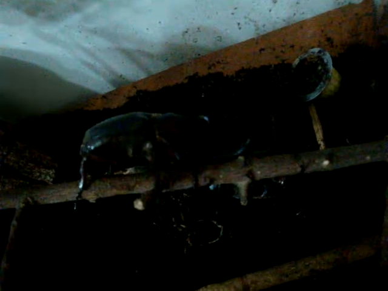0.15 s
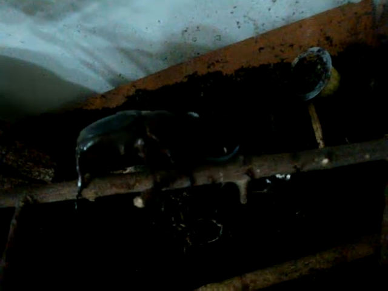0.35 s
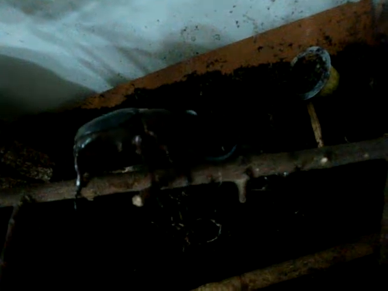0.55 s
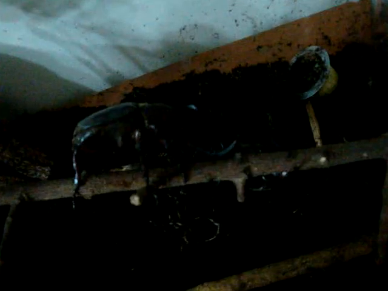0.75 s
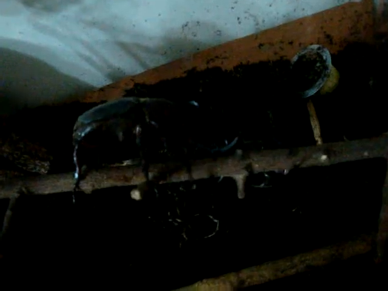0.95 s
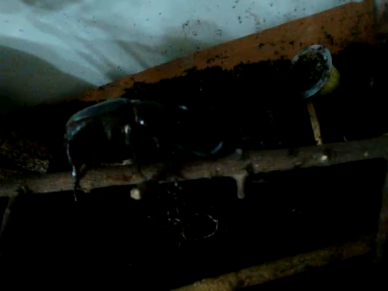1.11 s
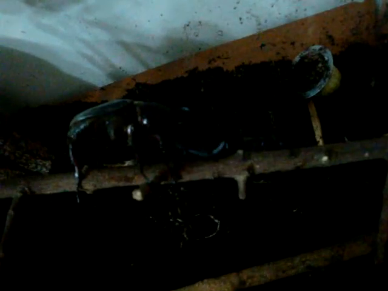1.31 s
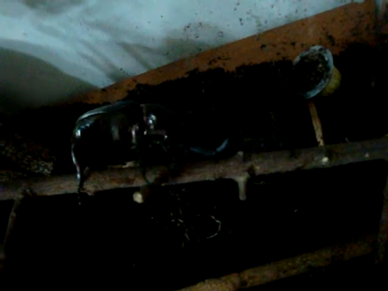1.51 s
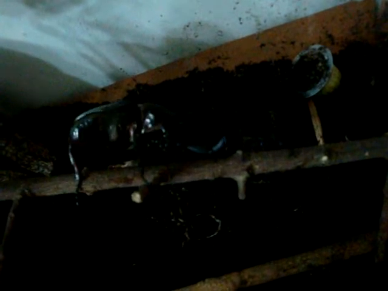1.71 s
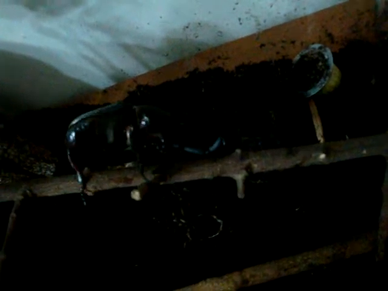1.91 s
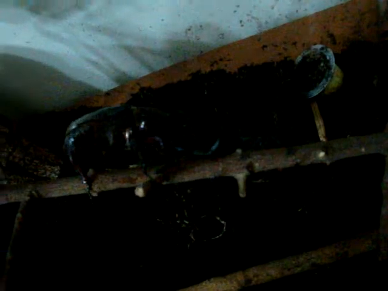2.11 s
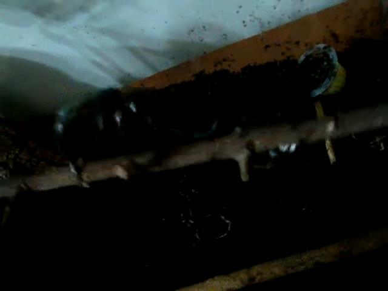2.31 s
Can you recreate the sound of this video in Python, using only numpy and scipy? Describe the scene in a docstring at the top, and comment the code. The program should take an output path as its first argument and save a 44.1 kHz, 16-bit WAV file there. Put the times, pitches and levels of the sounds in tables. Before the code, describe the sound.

Beetle claws scraping bark with a dull thump, then soft rustles and ticks indoors.

```python
"""From the start, an appliance buzzes at the mains rate over a steady indoor hiss.
Close by, a large beetle shifts on a twig in its keeping box, and a claw plucks a bark fibre.
Claws and shell slip twice in the first half second, scraping the bark and thumping the box.
Then it settles into soft rustles and ticks as its legs drag and its claws pluck,
joined from about one second on by the dry snaps of its claw tips."""
import sys
import numpy as np
from scipy.fft import rfft, irfft, next_fast_len
from scipy.io import wavfile
from scipy.ndimage import map_coordinates

SR = 44100
rng = np.random.default_rng(int(sys.argv[2]) if len(sys.argv) > 2 else 0)


def to_wav(s):
    """Save 16-bit WAV."""
    ch = np.atleast_2d(s).T  # columns
    pcm = np.round(np.clip(ch, -1, 1) * 32767)  # PCM
    wavfile.write(sys.argv[1], SR, pcm.astype(np.int16))


N = 103635


def amp(db):
    """Decibels to gain."""
    return 10 ** (np.asarray(db) / 20)


def unit(x):
    """Scale to rms 1."""
    return x / np.sqrt(np.mean(x ** 2) + 1e-20)


def clock():
    """The time of each sample in seconds."""
    return np.arange(N) / SR


def wobble(per_s):
    """A smooth random modulator with per_s new values a second."""
    return map_coordinates(rng.standard_normal(8192), [clock() * per_s], mode="wrap")


def filtered(x, response):
    """Filter x with a gain given as a function of frequency."""
    size = next_fast_len(N + SR // 2)
    return irfft(rfft(x, size) * response(np.fft.rfftfreq(size, 1 / SR)), size)[:N]


def coloured(x, curve, tilt_db=0):
    """x through an EQ curve, tilted by tilt_db per octave above 1 kHz, at rms 1."""
    hz, db = np.transpose(curve)

    def eq(f):
        curve_db = np.interp(np.log(f + 1), np.log(hz), db)
        return amp(curve_db + tilt_db * np.log2(np.maximum(f, 1000)))
    return unit(filtered(x, eq))


def noise_band(hz, width_hz):
    """White noise through a steep-sided resonance, at rms 1."""
    def band_pass(f):
        return 1j * f * width_hz / (hz * hz - f * f + 1j * f * width_hz)
    return unit(filtered(rng.standard_normal(N), lambda f: band_pass(f) ** 2))


def stroke(start, rise, fall_db_per_s):
    """An envelope with a smooth attack and an exponential decay."""
    t = clock() - start
    attack = np.sin(np.pi / 2 * np.clip(t / rise, 0, 1)) ** 2
    return attack * amp(-fall_db_per_s * np.maximum(t - rise, 0))


# partials of the buzz (harmonic [multiple of the mains rate], level [dB])
BUZZ_PARTIALS = [(2, -56.5), (3, -53), (5, -56), (6, -50.5), (7, -53), (8, -62.5), (10, -65), (11, -64),
                 (12, -53), (13, -61.5), (14, -57), (15, -97), (16, -72.5), (18, -83.5)]


def appliance(mains_hz=59.96, delay_s=0.004204, fizz_lag_s=0.0075):
    """Mains harmonics, nearly in phase, make one pulse a cycle, each followed by a faint fizz."""
    t = clock() - delay_s
    buzz = np.zeros(N)
    for harmonic, db in BUZZ_PARTIALS:
        gain = amp(db + 0.6 * wobble(per_s=3.72))
        buzz += gain * np.cos(2 * np.pi * harmonic * mains_hz * t + rng.normal(0, 0.3))
    fizz_gate = unit(np.cos(np.pi * mains_hz * (t - fizz_lag_s)) ** 24)
    return buzz + amp(-67) * fizz_gate * noise_band(5600, width_hz=4000)


# EQ of the room tone (frequency [Hz], relative level [dB])
HISS_EQ = [(20, -46), (55, 1), (80, -5.5), (125, 4), (200, 2), (300, 6), (420, 3.5), (560, -0.5),
           (780, 4.5), (1100, -3), (2200, -7.5), (2800, -9.5), (3800, -8), (4400, -8.5), (5500, -14.5),
           (7500, -16.5), (10000, -18)]


def room_hiss(level_db=-47.5, waver_db=0.76, flicker_db=2, split_hz=5000):
    """A steady bed of room air; its treble flickers a little."""
    air = amp(level_db + waver_db * wobble(per_s=7.16)) * coloured(rng.standard_normal(N), HISS_EQ)
    treble = filtered(air, lambda f: f > split_hz)
    return air - treble + treble * amp(flicker_db * wobble(per_s=60.16))


# plucks of bark fibres (time [s], level [dB], pitch [Hz])
FIBRE_TICKS = [(0.141, -48, 2780), (0.879, -48.5, 2630), (0.977, -48, 3200), (1.071, -42.5, 2830),
               (1.127, -52.5, 3120), (1.186, -54, 3300), (1.407, -46.5, 2830), (1.520, -48, 2830),
               (1.568, -51, 4000), (1.615, -48.5, 4440), (1.663, -42.5, 2780), (1.739, -45.5, 3360),
               (1.844, -48, 4680), (1.86, -49, 4520), (1.877, -41, 3610), (1.961, -48, 4500),
               (1.981, -48.5, 3240), (2.021, -51.5, 3490), (2.202, -46, 3370), (2.327, -47.5, 4650)]


def fibre_ticks(rise_s=0.0041, t60_s=0.061):
    """Claws pluck bark fibres, which ring with a short, rough tone."""
    out = np.zeros(N)
    for start, db, hz in FIBRE_TICKS:
        phase_jitter = wobble(per_s=750)
        tone = np.sqrt(2) * np.sin(2 * np.pi * hz * clock() + phase_jitter)
        out += amp(db) * stroke(start, rise_s, 60 / t60_s) * tone
    return out


def friction(grains_per_s=1500, spread_db=3, grain_share=0.62, judder_db=1.47):
    """Dense stick-slip grains of uneven size over smooth rubbing, under a juddering pressure."""
    impulses = (rng.random(N) < grains_per_s / SR) * rng.choice([-1, 1], N)
    grains = unit(impulses * amp(spread_db * rng.standard_normal(N)))
    rubbing = rng.standard_normal(N)
    texture = np.sqrt(grain_share) * grains + np.sqrt(1 - grain_share) * rubbing
    return texture * amp(judder_db * wobble(per_s=110))


# EQ of the hard scrape (frequency [Hz], relative level [dB])
SCRAPE_EQ = [(30, -17), (150, 8.5), (400, -2.5), (560, -8), (780, 1.5), (1200, -0.5), (2000, 0),
             (2800, -0.5), (3800, -7), (4300, -4.5), (5000, -6), (5500, -6.5), (6800, -11.5), (7700, -8.5),
             (9200, -11), (10200, -27)]
# EQ of the box rumble, under slips and drags alike (frequency [Hz], relative level [dB])
RUMBLE_EQ = [(20, -23.5), (50, -17.5), (68, -21), (95, -5), (132, 7), (155, -2), (183, -3.5), (230, -9),
             (300, 0.5), (370, -14.5), (480, -45), (1000, -57)]
# hard slips (time [s], attack [s], decay [dB/s], scrape [dB], shell ring [dB], rumble [dB])
HARD_SLIPS = [(.210, 0.027, 115, -41, -40.5, -48), (.459, 0.023, 140, -29.5, -39.5, -29.5)]


def hard_slips():
    """Each slip scrapes brightly, rings the shell for a moment and leaves the box rumbling."""
    out = np.zeros(N)
    for start, rise, fall, scrape_db, shell_db, rumble_db in HARD_SLIPS:
        scrape = stroke(start, rise, fall) * coloured(friction(), SCRAPE_EQ)
        shell = stroke(start, rise, fall_db_per_s=217) * noise_band(1986, width_hz=490)
        rumble = stroke(start, rise=0.04, fall_db_per_s=98) * coloured(friction(), RUMBLE_EQ)
        out += amp(scrape_db) * scrape + amp(shell_db) * shell + amp(rumble_db) * rumble
    return out


# low modes of the box (frequency [Hz], relative level [dB], time to fall 60 dB [s])
BOX_MODES = [(94, -8.5, 0.3), (108.4, -9, 0.45), (130.3, 1, 0.33), (182.4, -3, 0.3), (262.7, -7.5, 0.54),
             (303, 0, 0.21), (362, 1.5, 0.46)]
# thumps as a slip catches (time [s], level [dB], contact length [s], favoured pitch [Hz])
BOX_KNOCKS = [(0.223, -32, 0.045, 135), (.463, -19, 0.01855, 96.4), (.486, -23, .036, 171),
              (.594, -34.5, 0.017, 117.5)]


def box_knocks(focus_db_per_octave=15):
    """The box's modes swell during a contact and ring out; each contact favours one register."""
    out = np.zeros(N)
    for start, db, contact, pitch in BOX_KNOCKS:
        for hz, mode_db, t60 in BOX_MODES:
            loss_db = focus_db_per_octave * abs(np.log2(hz / pitch))
            tone = np.cos(2 * np.pi * hz * (clock() - start - contact))
            out += amp(db + mode_db - loss_db) * stroke(start, contact, 60 / t60) * tone
    return out


# EQ of the soft rustle (frequency [Hz], relative level [dB])
RUSTLE_EQ = [(60, -38), (130, 9.5), (300, -4.5), (560, -12), (900, 3.5), (1300, -0.5), (1900, 6),
             (2500, 0.5), (3400, 2.5), (3850, -12), (4600, 1), (6000, -9), (7500, -11.5), (10000, -15.5)]
# soft drags (time [s], attack [s], decay [dB/s], rustle [dB], treble tilt [dB/octave], rumble [dB])
LEG_DRAGS = [(.35, 0.092, 55, -51, -12.5, -45.5), (0.531, .10, 136, -39, -1.5, -44),
             (0.857, .024, 129, -48, -3, -54), (1.365, 0.037, 335, -48.5, 3, -60),
             (1.68, 0.047, 57, -48.5, -1.5, -52.5), (1.785, 0.022, 130, -45, -2.5, -67),
             (1.835, 0.051, 126, -43.5, .5, -53)]


def leg_drags():
    """Legs drag lightly over the bark and stir a low rumble in the box."""
    out = np.zeros(N)
    for start, rise, fall, rustle_db, tilt_db, rumble_db in LEG_DRAGS:
        rustle = amp(rustle_db) * coloured(friction(), RUSTLE_EQ, tilt_db)
        rumble = amp(rumble_db) * coloured(friction(), RUMBLE_EQ)
        out += stroke(start, rise, fall) * (rustle + rumble)
    return out


# snaps of the claw tips (time [s], level [dB], band centre [Hz])
CLAW_SNAPS = [(1.025, -45, 6400), (1.494, -46, 6500), (1.769, -45.5, 7100), (1.946, -43.5, 10000),
              (2.331, -45.5, 6960)]


def claw_snaps(rise_s=0.0028, t60_s=0.027):
    """Claw tips snap in dry, bright bursts of noise."""
    return sum(amp(db) * stroke(start, rise_s, 60 / t60_s) * noise_band(hz, width_hz=4800)
               for start, db, hz in CLAW_SNAPS)


def scene():
    """The beetle in its box over a bed of buzz and hiss, in mono."""
    bed = appliance() + room_hiss()
    beetle = fibre_ticks() + hard_slips() + box_knocks() + leg_drags() + claw_snaps()
    return (bed + beetle)[None]


def record(dry):
    """A brick-wall low-pass takes the very top off the mix."""
    cutoff_hz = 10020
    return filtered(dry[0], lambda f: 1 / np.sqrt(1 + (f / cutoff_hz) ** 260))[None]


dry = scene()
out = record(dry)
to_wav(out)
```